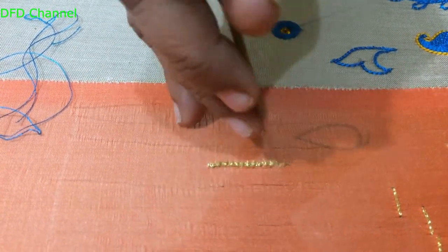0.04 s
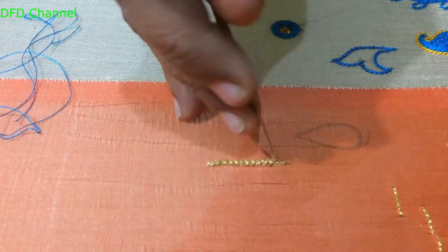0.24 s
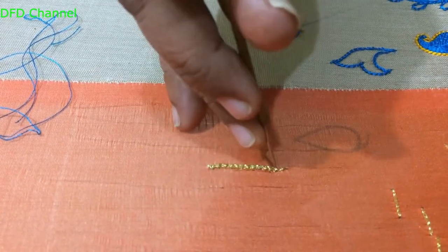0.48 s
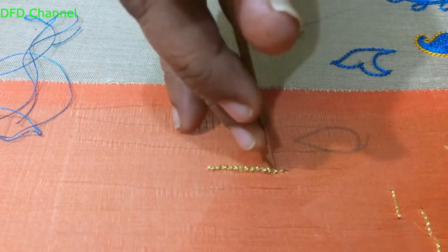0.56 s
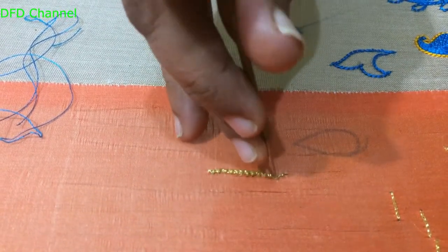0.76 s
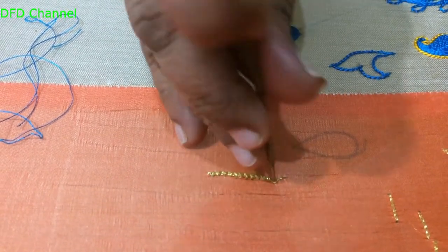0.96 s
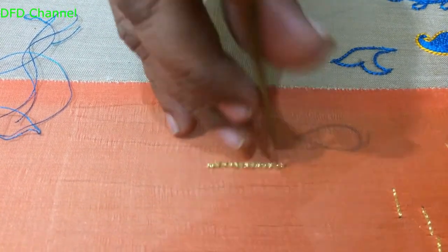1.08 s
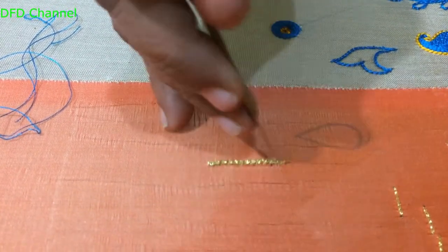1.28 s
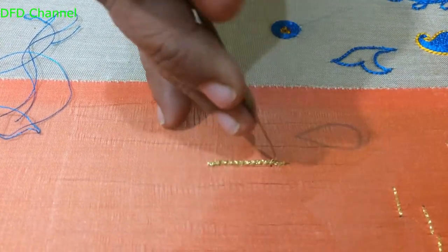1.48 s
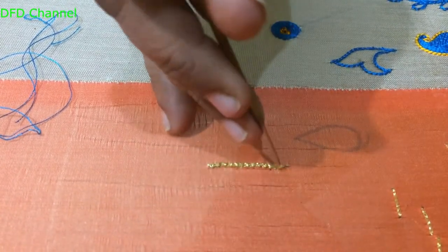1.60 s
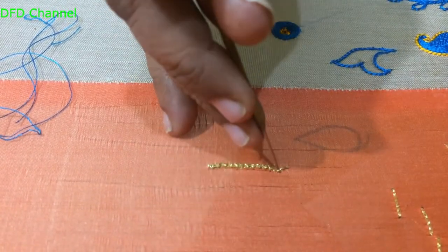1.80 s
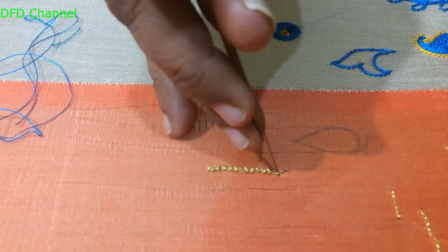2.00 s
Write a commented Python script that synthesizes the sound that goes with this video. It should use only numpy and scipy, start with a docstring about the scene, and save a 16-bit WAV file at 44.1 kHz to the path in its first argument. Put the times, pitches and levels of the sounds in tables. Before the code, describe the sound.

An embroidery needle pierces taut cloth with a sharp, drum-like pop, then a few softer ticks and crackling tugs, then a second sharp pop. Thread hisses faintly through the weave. The microphone is close, in a quiet room.

```python
"""A quiet room, close up on a hooked embroidery needle working through cloth stretched on a frame.
Each stab parts the weave with a crack and lets the cloth spring back like a slack drumhead.
Between stabs the hook tugs in short, crackling slips, the dented cloth sags back with a soft thud,
and thread slides through with a faint hiss. Underneath lie room tone and the low sway of the frame."""
import sys
import numpy as np
from scipy import signal
from scipy.fft import rfft, irfft
from scipy.io import wavfile
from scipy.ndimage import uniform_filter1d

SR = 44100
rng = np.random.default_rng(int(sys.argv[2]) if len(sys.argv) > 2 else 0)


def digitize_waveform(pressure):
    """Quantize a signal to 16-bit integers and store it at the path in sys.argv[1].

    Rows of a 2-D input are taken as channels; values are limited to [-1, 1].
    """
    field = np.atleast_2d(pressure).T
    bounded = np.clip(field, -1, 1)
    quanta = np.round(bounded * 32767).astype(np.int16)
    wavfile.write(sys.argv[1], SR, quanta)


N = 90404

# tone of parting fibres: freq_hz, level_db
CRACK_SPECTRUM = [(100, -27.5), (500, -0.5), (1000, -1.5), (1600, 8), (2600, 3.5), (4200, 2.5), (7000, -2),
                  (10000, -7), (12500, -3), (16000, -16)]


def amp(db):
    """Decibels to gain."""
    return 10 ** (np.asarray(db) / 20)


def unit(x):
    """Scales to an rms of one."""
    return x / np.sqrt(np.mean(x ** 2) + 1e-20)


def curve_at(points, hz):
    """Reads a curve on a log-frequency axis."""
    freqs, values = np.transpose(points)
    return np.interp(np.log(hz + 1), np.log(freqs + 1), values)


def add(mix, start_s, sound):
    """Mixes a sound in at a time."""
    part = mix[max(round(start_s * SR), 0):][:len(sound)]
    part += sound[:len(part)]


def through(x, response):
    """Convolves, up to the scene's length."""
    return signal.fftconvolve(x, response)[:N]


def click(spectrum, tilt_db_per_octave=0, lowpass_hz=SR, size=8192):
    """A minimum-phase click with a given spectrum, tilted around 212 Hz and low-passed."""
    hz = abs(np.fft.fftfreq(size, 1 / SR))
    level_db = curve_at(spectrum, hz) + tilt_db_per_octave * np.log2((hz + 20) / 212)
    log_gain = np.log(amp(level_db) / np.hypot(1, (hz / lowpass_hz) ** 2))
    response = np.exp(np.conj(signal.hilbert(log_gain)))
    return np.fft.ifft(response).real[:size // 2]


def band_noise(centre_hz, width_octaves):
    """Noise in a bell-shaped band."""
    hz = np.fft.rfftfreq(N, 1 / SR) + 1
    bell = np.exp(-.5 * (np.log2(hz / centre_hz) / width_octaves) ** 2)
    return unit(irfft(rfft(rng.standard_normal(N)) * bell, N))


def reflections(t60_s, size=6000):
    """A dense, dying cluster of reflections with an energy of one."""
    t = np.arange(size) / SR
    taps = rng.choice([-1., 1.], size) * amp(-60 * t / t60_s) * (1 - amp(-600 * t / t60_s))
    return taps / np.linalg.norm(taps)


def room_tone(level_db=-58.5):
    """A steady, dark bed of air."""
    # colour of the air: freq_hz, relative_db
    air_spectrum = [(12, -70), (20, -7), (107, -6.5), (142, 1.5), (222, -10), (422, -8.5), (624, -19),
                    (678, -14), (1440, -21), (2020, -25.5), (7730, -34.5), (16000, -41)]
    colour = amp(curve_at(air_spectrum, np.fft.rfftfreq(N, 1 / SR)))
    return amp(level_db) * unit(irfft(rfft(rng.standard_normal(N)) * colour, N))


def room_tail(dry, fade_in_s=0.024):
    """The room's faint, diffuse reverb; the very top dies first."""
    # reverb time: freq_hz, t60_s
    decay_times = [(100, 1.75), (250, 1.04), (800, 1.33), (2000, 1.07), (5000, 1.48), (14000, 0.77)]
    # reverb colour: freq_hz, level_db
    tail_spectrum = [(60, -46), (180, -24.5), (400, -18.5), (850, -20), (2000, -15), (5000, -23),
                     (9000, -17.5), (14000, -26.5)]
    hz, t, bands = signal.stft(rng.standard_normal(SR), SR, nperseg=256)
    decay_rate = np.log(1000) / curve_at(decay_times, hz)[:, None]
    gain = amp(curve_at(tail_spectrum, hz))[:, None] * np.sqrt(2 * decay_rate / SR)
    tail = signal.istft(bands * gain * np.exp(-decay_rate * t), SR, nperseg=256)[1]
    fade_in = np.minimum(np.arange(len(tail)) / SR / fade_in_s, 1)
    return through(dry, tail * fade_in)


def floor_echo(dry):
    """A short, smeared bounce off the floor."""
    # colour of the bounce: freq_hz, level_db
    floor_spectrum = [(40, -21), (200, -19), (800, -15.5), (3000, -14), (14000, -23)]
    return through(through(dry, click(floor_spectrum)), reflections(t60_s=0.092))


def hand_scatter(crack):
    """Tight reflections off the hand and frame, different for every crack."""
    return amp(-2) * through(crack, reflections(t60_s=0.015))


def frame_sway():
    """The frame sways under the hand: a low, wavering hum that comes and goes."""
    # fader moves of the sway: time_s, level_db
    sway_levels = [(0, -75), (.72, -77), (.82, -58.5), (.98, -63.5), (1.401, -70), (1.57, -101),
                   (1.63, -59), (1.82, -56), (1.95, -91), (2.05, -78)]
    phase = np.angle(signal.hilbert(band_noise(centre_hz=67.3, width_octaves=0.2)))
    level_db = np.interp(np.arange(N) / SR, *np.transpose(sway_levels))
    return amp(level_db) * unit(np.cos(phase))


def thread_slides(grain_db=1):
    """Thread and fingers slide over the weave: a grainy hiss swells and fades with each stroke."""
    # sliding strokes: peak_s, half_length_s, level_db, centre_hz, width_octaves
    strokes = [(0.914, 0.052, -64.5, 1860, 0.9), (1.07, 0.022, -69.5, 9800, 0.34),
               (1.152, 0.11, -70.5, 2580, 0.082), (0.986, 0.06, -58, 417, 0.51),
               (1.166, 0.15, -71.5, 3830, 1), (1.963, 0.14, -76.5, 6400, 0.46)]
    t, out = np.arange(N) / SR, np.zeros(N)
    for peak_s, half_length_s, level_db, centre_hz, width_octaves in strokes:
        grain = amp(grain_db * unit(uniform_filter1d(rng.standard_normal(N), size=120)))
        swell = np.exp(-.5 * ((t - peak_s) / half_length_s) ** 2)
        out += amp(level_db) * swell * unit(grain * band_noise(centre_hz, width_octaves))
    return out


def cloth_thuds(pitch_hz=85, length_cycles=1.6):
    """The dented cloth sags back with a soft thud, swinging as a whole."""
    # sags of the cloth: start_s, level_db
    sags = [(.128, -29.5), (1.277, -32.5)]
    out, cycles = np.zeros(N), np.arange(0, length_cycles, pitch_hz / SR)
    envelope = np.sin(np.pi * np.sqrt(cycles / length_cycles)) ** 2
    for start_s, level_db in sags:
        add(out, start_s, amp(level_db) * envelope * np.sin(2 * np.pi * cycles))
    return out


def hook_tugs(slip_gap_s=0.0045, jitter=0.191, fibres_per_s=1200):
    """The hook drags: uneven stick-slip shakes the cloth while single fibres crackle."""
    # pulls of the hook: peak_s, rise_s, fall_s, gain_db, tilt_db_per_octave, crackle_db
    pulls = [(.002, 0.012, 0.0093, -31, 1, -34), (.094, 0.0019, 0.031, -34.5, -1, -63),
             (0.128, 0.019, .005, -28, -3.5, -50), (0.203, .002, 0.0027, -35, -0.5, -44),
             (0.232, 0.0053, 0.0025, -14.5, -6, -33), (1.115, .017, 0.008, -26.5, -6, -45.5),
             (1.15, 0.003, 0.013, -23, -0.5, -39), (1.261, 0.0065, 0.0096, -27.5, -3, -49),
             (1.272, 0.0015, .011, -26.5, 0, -46), (1.463, 0.0051, 0.0015, -27.5, 2, -54)]
    # tone of the cloth in a sideways slip: freq_hz, level_db
    slip_spectrum = [(20, -24), (70, 40), (130, 37), (185, 35), (290, 30.5), (410, 14), (580, 23),
                     (850, 23.5), (1150, 4), (1700, 5), (3000, -14), (8000, -45)]
    t, slips, crackle_envelope = np.arange(N) / SR, np.zeros(N), np.zeros(N)
    steps = np.arange(-6, 7)
    for peak_s, rise_s, fall_s, gain_db, tilt, crackle_db in pulls:
        pull = np.exp(-abs(t - peak_s) / np.where(t < peak_s, rise_s, fall_s))
        slip = click(slip_spectrum, tilt)
        stray = jitter * rng.standard_normal(len(steps)) * (steps != 0)  # middle slip stays on the peak
        for slip_s in peak_s + slip_gap_s * (steps + stray):
            add(slips, slip_s, amp(gain_db) * np.interp(slip_s, t, pull, left=0) * slip)
        crackle_envelope += amp(crackle_db) * pull
    snaps = rng.standard_normal(N) * (rng.random(N) < fibres_per_s / SR)
    fibre_crack = click(CRACK_SPECTRUM, tilt_db_per_octave=-0.2, lowpass_hz=11000)
    return slips + through(crackle_envelope * snaps, fibre_crack)


def fibre_ticks():
    """Single fibres give way with tiny ticks; returns direct and scattered sound."""
    # fibre breaks: start_s, gain_db
    breaks = [(.2207, -41), (0.2245, -35.5), (1.4546, -45), (1.8472, -39), (1.8883, -40.5)]
    direct, scatter = np.zeros(N), np.zeros(N)
    for start_s, gain_db in breaks:
        tick = amp(gain_db) * click(CRACK_SPECTRUM)
        add(direct, start_s, tick)
        add(scatter, start_s, hand_scatter(tick))
    return direct, scatter


def needle_stabs(tear_db=-21, tear_rise_s=0.0016, recoil_delay_s=0.00065):
    """The weave tears and cracks, then the cloth recoils and rings; returns direct and scattered sound."""
    # the needle breaks through:
    # start_s, thump_db, thump_tilt_db_per_octave, crack_db, crack_lowpass_hz, direction (+1 in, -1 out)
    stabs = [(.236, .5, 0.34, -1, 16100, 1), (0.5635, -32, -1.2, -23.5, 6500, -1),
             (0.9137, -19.5, -0.41, -18.5, 5770, -1), (1.4657, -8, 1, 0, 6440, 1)]
    # thump of the taut cloth on sudden release: freq_hz, level_db
    thump_spectrum = [(10, -17), (35, 26), (72, 35.5), (120, 34.5), (180, 38), (260, 29), (385, 14.5),
                      (520, 21), (720, 27.5), (950, 19.5), (1200, 1), (2500, -16), (8000, -19.5)]
    # ringing modes of cloth and frame: pitch_hz, level_db, t60_s
    modes = [(82.6, -40, 0.042), (181.6, -24.5, .09), (230, -34, 0.098), (336.2, -42.5, 0.31),
             (654, -53, .25), (867, -52, 0.4), (944, -39, 0.21)]
    direct, scatter, t = np.zeros(N), np.zeros(N), np.arange(SR // 2) / SR
    ring = sum(amp(db - 60 * t / t60_s) * np.sin(2 * np.pi * hz * t) for hz, db, t60_s in modes)
    swell = np.exp(-t[t < 6 * tear_rise_s] / tear_rise_s)[::-1]
    for start_s, thump_db, tilt, crack_db, lowpass_hz, direction in stabs:
        crack = -direction * amp(crack_db) * click(CRACK_SPECTRUM, lowpass_hz=lowpass_hz)
        add(direct, start_s, crack)
        # fibres start to part just before the break
        tear = swell * rng.standard_normal(len(t))[:len(swell)] / np.linalg.norm(swell)
        add(scatter, start_s - len(tear) / SR, amp(tear_db) * through(crack, tear))
        add(scatter, start_s, hand_scatter(crack))
        recoil = direction * amp(thump_db)
        add(direct, start_s + recoil_delay_s, recoil * click(thump_spectrum, tilt))
        add(direct, start_s + recoil_delay_s, recoil * ring)
    return direct, scatter


def scene():
    """Needle, cloth and thread with their reflections, over frame sway and room tone, in mono."""
    stabs, stab_scatter = needle_stabs()
    ticks, tick_scatter = fibre_ticks()
    direct = stabs + ticks + hook_tugs() + cloth_thuds() + thread_slides()
    space = stab_scatter + tick_scatter + floor_echo(direct) + room_tail(direct)
    return (direct + space + room_tone() + frame_sway())[None]


def record(dry, clip_level=0.85, lowpass_hz=16400):
    """The hardest stabs overload the microphone; a steep low-pass trims the top."""
    clipped = np.clip(dry, -clip_level, clip_level)
    lowpass = signal.firwin(511, lowpass_hz, window=("kaiser", 9), fs=SR)
    return signal.oaconvolve(clipped, lowpass[None], "same")


dry = scene()
out = record(dry)
digitize_waveform(out)
```